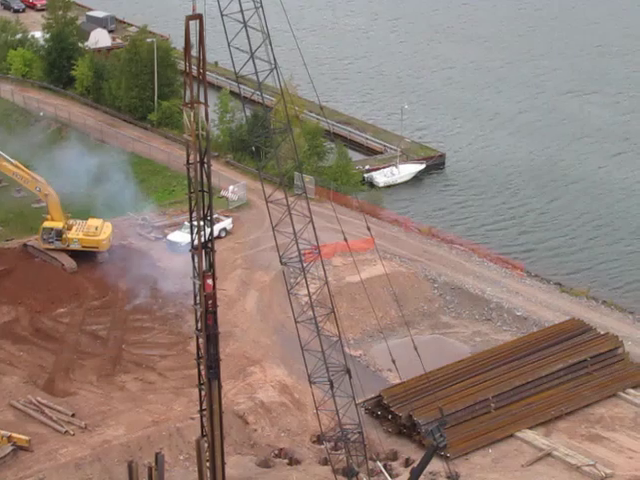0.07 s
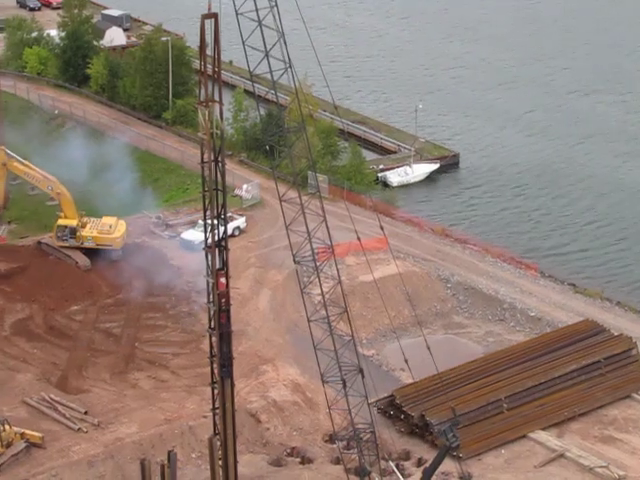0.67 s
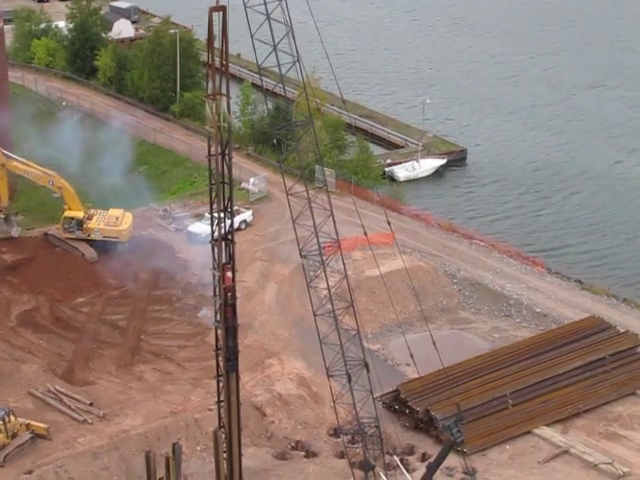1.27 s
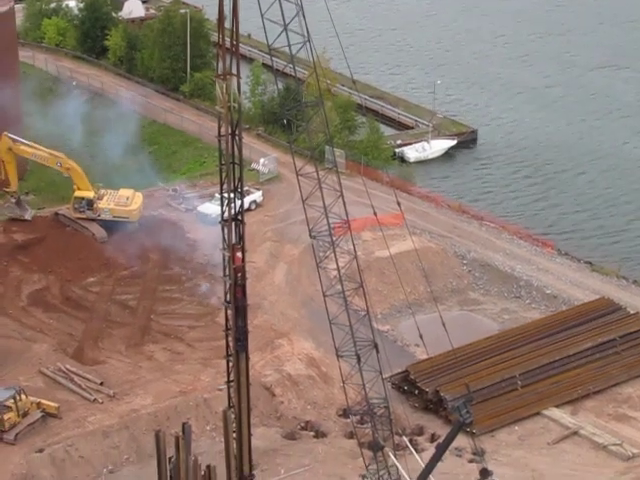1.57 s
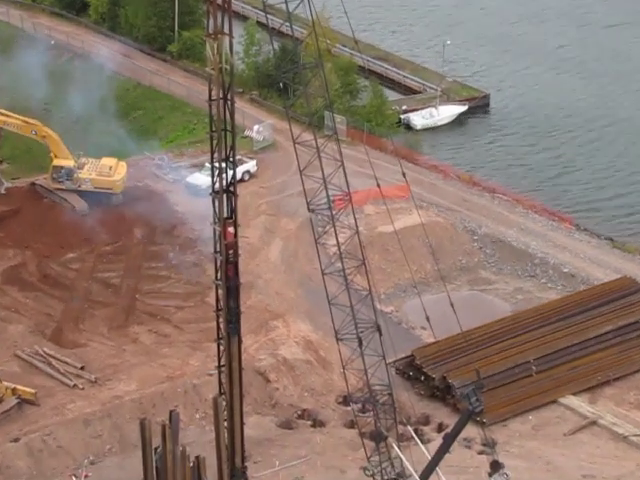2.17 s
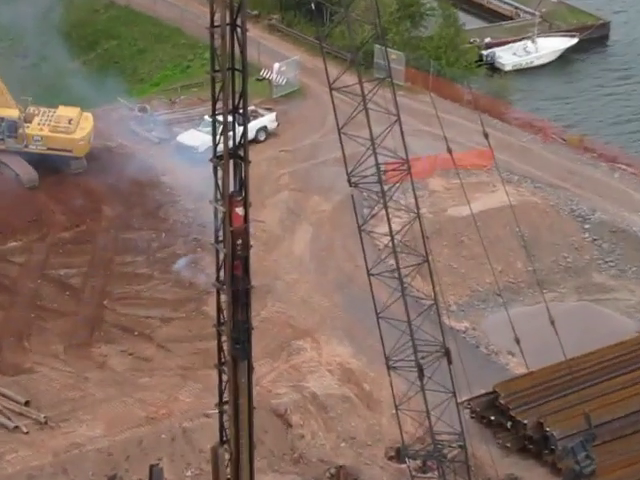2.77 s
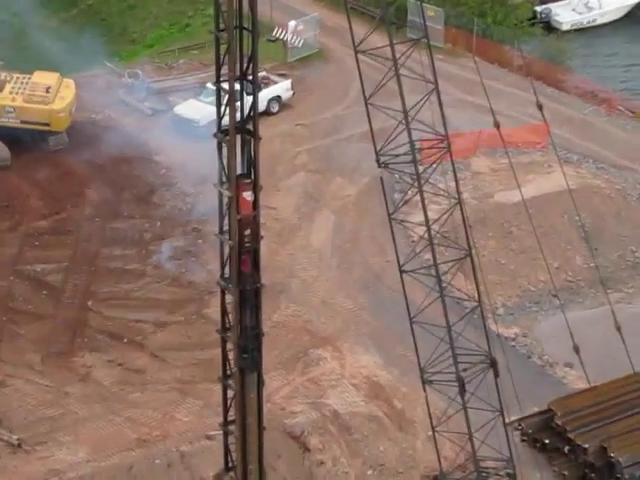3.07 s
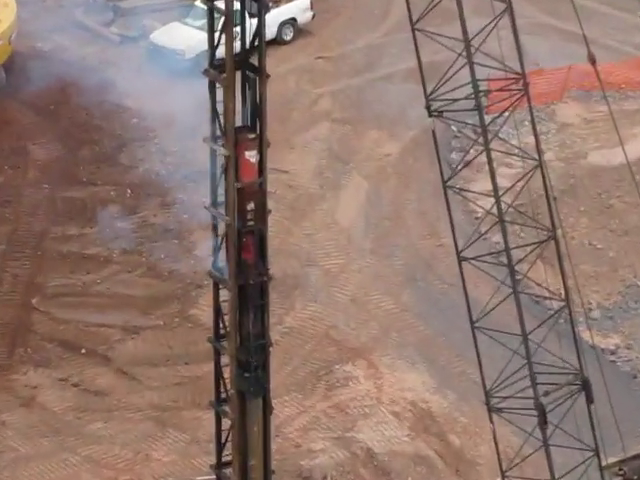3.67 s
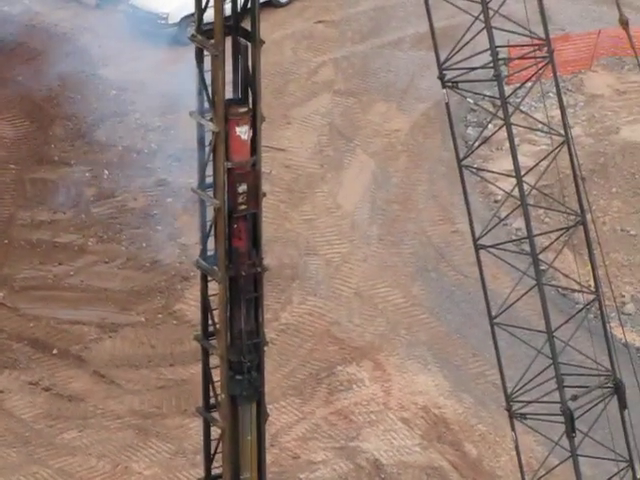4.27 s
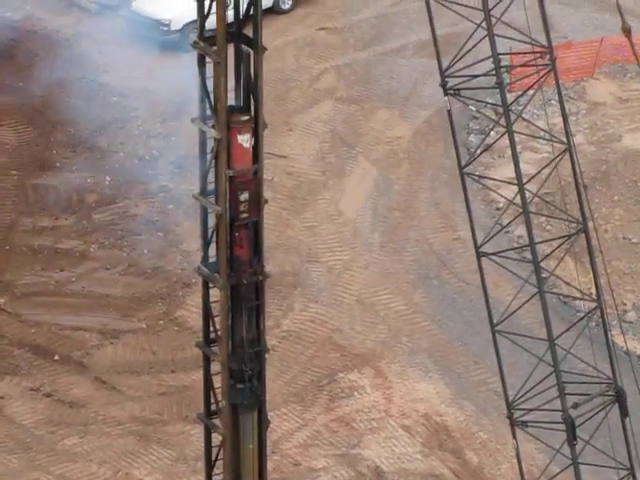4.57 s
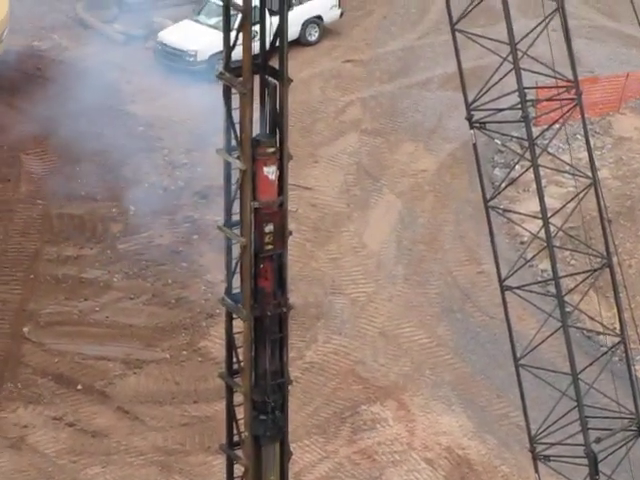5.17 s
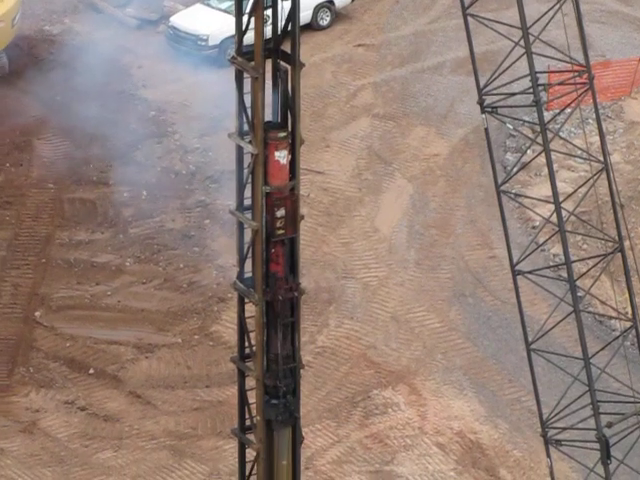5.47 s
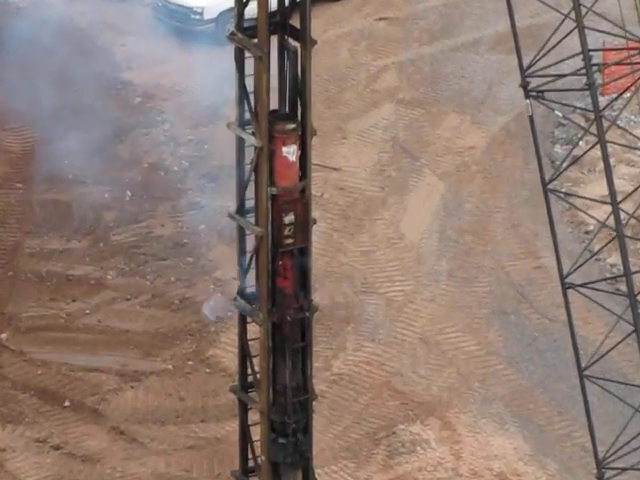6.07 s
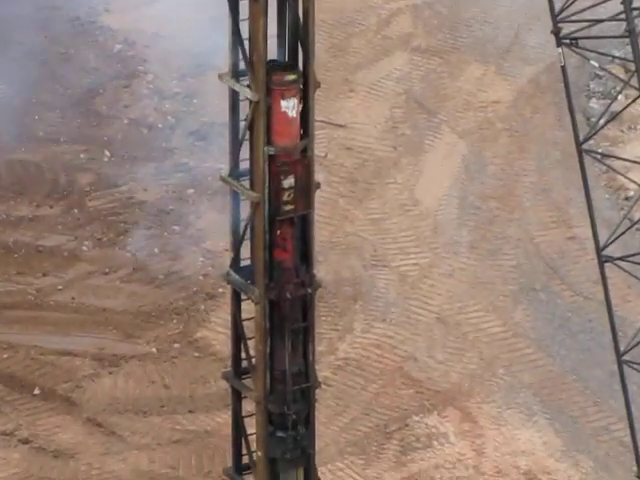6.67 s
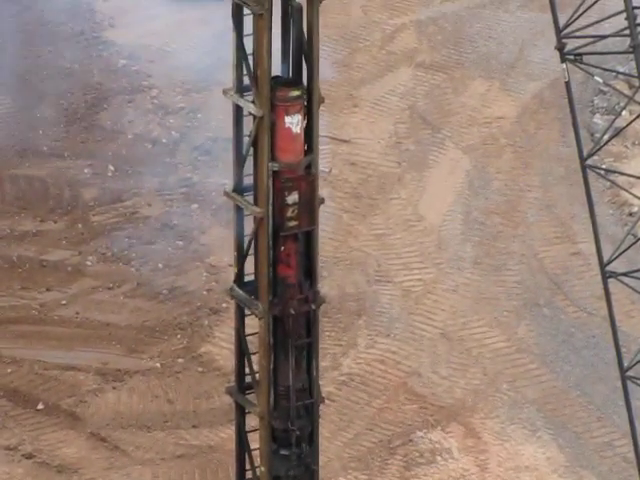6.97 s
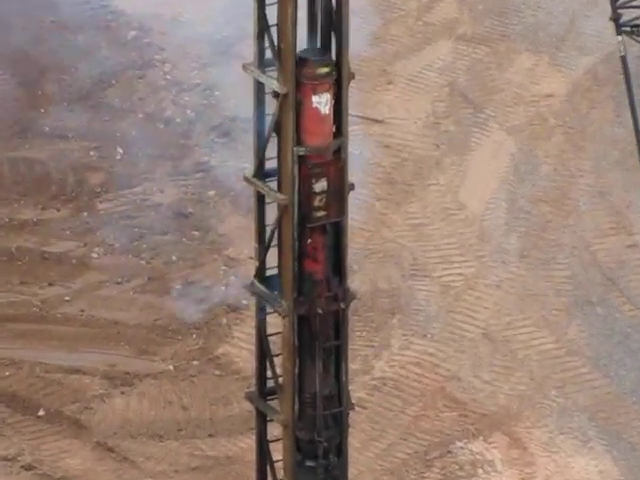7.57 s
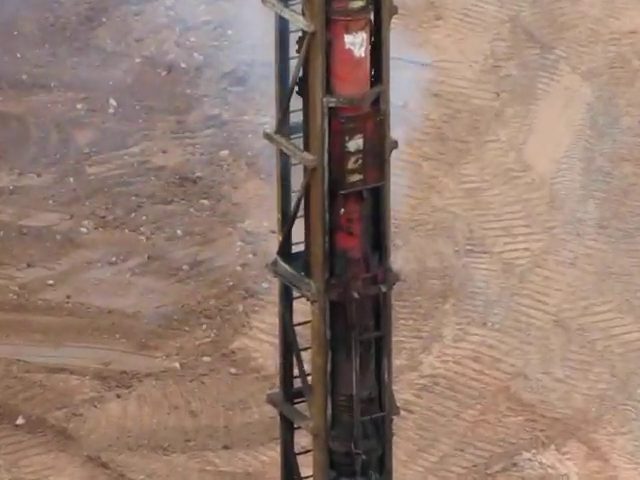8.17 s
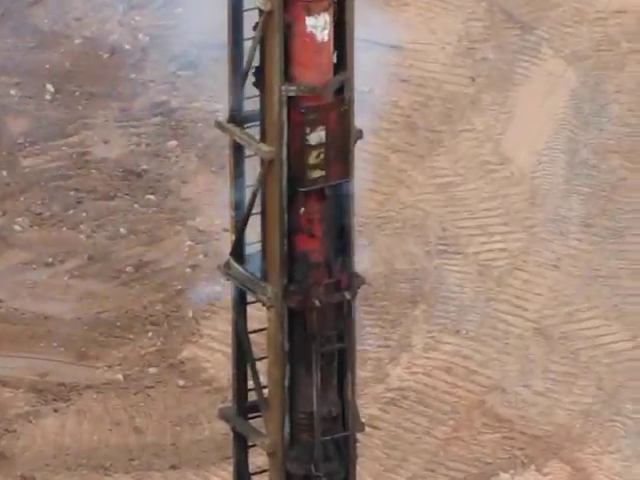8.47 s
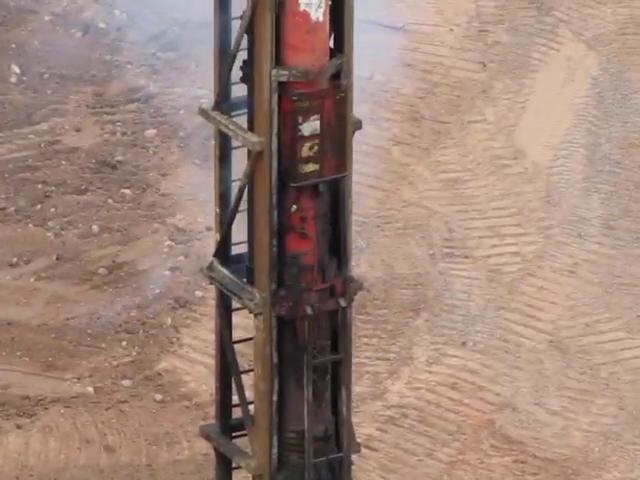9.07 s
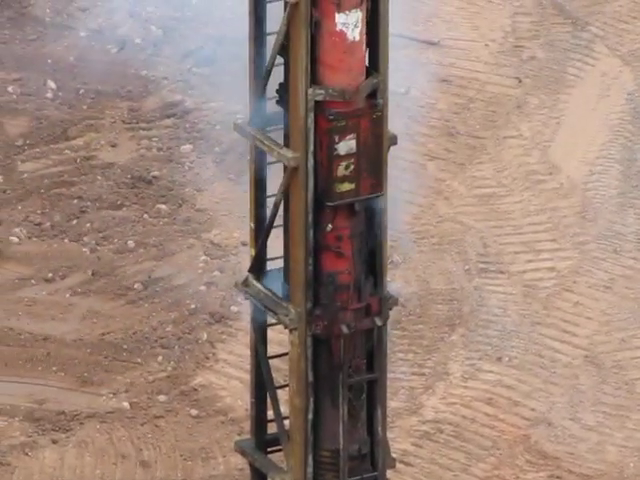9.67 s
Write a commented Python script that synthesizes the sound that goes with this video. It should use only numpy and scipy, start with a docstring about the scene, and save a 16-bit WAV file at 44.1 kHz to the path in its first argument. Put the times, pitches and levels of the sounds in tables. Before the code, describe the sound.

A diesel pile hammer drives a steel pile on a waterfront building site, heard from high above. The sound opens on the ringing tail of a blow. Further heavy blows land at about 1.1, 2.3, 3.5, 4.8, 6.0, 7.2, 8.4 and 9.6 seconds. Each is led by a faint click and the hiss of the falling ram, then hits with a hard crack and ringing steel. A sharp, hissing exhaust burst follows immediately, and an echo rolls back from the surroundings. The background dips slightly at each blow. Crane and excavator engines drone underneath, growing louder around 2 seconds, with a thin hydraulic whine and a faint fan hum. Loose steel clinks lightly near 2.6 seconds and rattles near 7 seconds. Low wind rumbles softly on the microphone, with one brief gust at about 8 seconds.

```python
"""A waterfront building site, the microphone high above a diesel pile hammer driving a steel pile.
Every 1.2 s the falling ram hisses, strikes and fires: the pile rings, exhaust bursts from the ports,
and far banks and buildings answer. Crane and excavator engines, hydraulics and a fan run underneath.
Wind rumbles on the microphone, and its gain control ducks at the blows."""
import sys
import numpy as np
from scipy import signal
from scipy.fft import rfft, irfft, next_fast_len
from scipy.io import wavfile
from scipy.ndimage import map_coordinates

SR = 44100
rng = np.random.default_rng(int(sys.argv[2]) if len(sys.argv) > 2 else 0)


def put_to_file(sound):
    """Save the sound as 16-bit audio at rate SR, in the file named by the first command-line argument."""
    columns = np.atleast_2d(sound).T  # one column per channel
    safe = np.clip(columns, -1, 1)
    whole_steps = np.round(safe * 32767)
    wavfile.write(sys.argv[1], SR, whole_steps.astype(np.int16))


N = 437472

# Levels in spectra, resonances and modes are relative; a noise spectrum gives the level per hertz.
# sound straight from the hammer to the microphone: f/Hz, left-right correlation
DIRECT = [(60, 0.97), (150, 0.94), (380, 1.0), (950, 0.98), (2380, 0.98), (5980, 0.81), (15000, 0.92)]
# sound reaching the microphone from all around: f/Hz, left-right correlation
DIFFUSE = [(60, 0.98), (130, 1), (290, 0.99), (640, 0.98), (1410, 0.89), (3100, 0.72), (6820, 0.68),
           (15000, 0.26)]
# wind rumble: f/Hz, level/dB
WIND_SPECTRUM = [(15, -7), (50, -5.5), (110, -7), (250, -17), (1000, -71), (5000, -120)]
# roar of the diesel engines: f/Hz, level/dB
ENGINE_SPECTRUM = [(13, -47), (22, -20.5), (99, -3.5), (130, -10), (237, -6.5), (271, -7.5), (347, -4.5),
                   (387, -14), (455, -11), (494, -11.5), (1090, -15), (2610, -18.5), (3250, -24),
                   (5320, -28), (15000, -80)]
# level of the engine roar over time: t/s, level/dB
ENGINE_LEVEL = [(0, -30), (1, -32), (2, -25.5), (7.8, -24.5), (9.9, -25.5)]
# engine tones, the firing rate first: f/Hz, level/dB, width/Hz
ENGINE_TONES = [(101.5, -35, 2.2), (236.5, -40.5, 5), (316, -47, 5.9), (455, -40, 5.4), (800, -46.5, 22),
                (1250, -47, 14)]
# whine of the hydraulics: f/Hz, width/Hz, level/dB
WHINE_PEAKS = [(2117, 95, -2.5), (2244, 60, 0), (2390, 85, -1.5), (2603, 70, 3), (2580, 1100, -9),
               (5400, 1300, -21.5), (9410, 60, -39)]
# the whine as the hydraulics work: t/s, level/dB
HYDRAULIC_EFFORT = [(0, -32.5), (1.4, -41), (2.2, -31.5), (4.4, -30.5), (6.6, -36), (9.9, -38.5)]
# the pump works: start/s, end/s, level added to idle/dB
PUMP_RUNS = [(0.1, 0.8, -44.5), (9.08, 9.55, -39.5)]
# the fan works harder: start/s, end/s, level added to idle/dB
FAN_RUNS = [(4.25, 4.45, -39), (6.7, 7.85, -32)]
# echo of the site: f/Hz, level/dB
ECHO_SPECTRUM = [(60, -24), (170, 4.5), (370, -1.5), (520, 0.5), (800, 5), (1400, -4.5), (2150, 4),
                 (3200, -2), (5000, -16.5), (8000, -24), (11000, -46.5), (15000, -71)]
# decay of that echo: f/Hz, t60/s
ECHO_DECAY = [(100, 1.94), (800, 1.79), (2500, 1.013), (8000, 1.08)]
# loose steel on the leader, the hammer's guide mast: t/s, level/dB, f/Hz, t60/s
CLINKS = [(2.59, -23, 2130, 0.35), (3.82, -30, 2100, .3), (7.01, -26, 745, 0.56)]
# the hammer rattles on its leader: t/s, level/dB, t60/s
RATTLES = [(3.12, -34, .2), (7.01, -29, .22), (7.056, -33, .25)]
# hiss and scrape of the sliding ram: f/Hz, level/dB
SLIDE_SPECTRUM = [(300, -31), (900, -24.5), (2400, 5.5), (4200, -6.5), (6000, -13), (8000, -19),
                  (10000, -35), (15000, -47)]
# gas through barely open ports: f/Hz, level/dB
HISS_SPECTRUM = [(1000, -26), (3000, -15), (3700, 7.5), (4350, -6), (4850, -0.5), (6200, -8), (7700, -6),
                 (8700, -14), (11000, -22), (15500, -41)]
# the full exhaust burst: f/Hz, level/dB
EXHAUST_SPECTRUM = [(100, -10.5), (600, -18), (1300, -4), (2000, 0), (3100, -1), (3650, -5), (4300, -11),
                    (4800, -7.5), (6200, -17), (7800, -26), (15500, -61)]
# resonances at which the ports bark: f/Hz, width/Hz, level/dB
PORT_PEAKS = [(2040, 330, 0), (2380, 500, -4), (3780, 400, -4), (4740, 260, -5.5)]
# the pile's longest notes: f/Hz, width/Hz, level/dB
HUM_PEAKS = [(371.8, 27, -1), (824, 50, -11), (1046, 24, -9)]
# bending wave along the pile: f/Hz, level/dB
BEND_SPECTRUM = [(110, -42), (170, -11), (240, 0), (330, -19.5), (600, -10.5), (900, -21), (1150, -18),
                 (1500, -23), (3000, -46)]
# modes of the pile: f/Hz, level/dB, delay/s, swell/s, t60/s
PILE_MODES = [(79, -19.5, 0.0065, 0.011, 0.31), (139.3, -13.5, 0.0036, 0.013, 0.22),
              (189, -9, 0.0011, 0.042, 0.19), (244.4, -1.5, 0.019, 0.019, 0.15),
              (352.7, -1.5, 0.0394, 0.015, 0.21), (383.7, -9.5, 0.055, 0.021, 0.4),
              (455.4, -9, .015, 0.015, 0.32), (515, -15.5, 0.0053, 0.032, 0.3),
              (648, -15, 0.011, 0.033, 0.16), (822, -13, 0.021, 0.054, 0.23), (936, -21, 0, 0.017, 0.5),
              (1046, -16.5, 0.0094, .02, 0.32), (1091, -13, .005, 0.013, 0.21),
              (1244, -14, 0.013, 0.01, 0.65), (1414, -26, .005, .015, .25), (1915, -14, 0.013, .015, 0.33),
              (2110, -20, 0.0058, 0.022, 0.33), (2422, -17, 0, 0.012, 0.34),
              (2627, -13.5, 0.002, 0.0084, 0.18), (3570, -24, 0, .015, .3)]
# dense ringing of the steel: f/Hz, level/dB
STEEL_SPECTRUM = [(60, -23), (300, 9.5), (550, -0.5), (750, -0.5), (1150, -2), (1450, -9.5), (1900, -2),
                  (2600, -5), (3500, -9.5), (5000, -19), (7500, -28), (9500, -50), (15000, -62)]
# decay of that ringing: f/Hz, t60/s
STEEL_DECAY = [(300, 0.29), (1200, 0.61), (2500, 0.56), (8000, 0.29)]
# modes of the anvil and drive cap: f/Hz, level/dB, t60/s
ANVIL_MODES = [(194, -1, 0.044), (373.4, 2.5, 0.05), (850, 2, 0.034), (999, 0.5, 0.049),
               (1246, -10.5, 0.082), (1906, 1.5, 0.028), (2160, -6.5, 0.11), (2340, -13, .05),
               (2616, -2, 0.053)]
# crack of the impact: f/Hz, level/dB
CRACK_SPECTRUM = [(100, -20), (400, -6), (1000, -3), (2600, -3.5), (4000, -14.5), (7000, -30.5),
                  (10000, -49), (15000, -60)]
# the blows: t/s, blow gain/dB, exhaust gain/dB, port hiss gain/dB, strike gain/dB, fuel lever level/dB
BLOWS = [(-0.078, -2.5, -5, -5.5, 0, -40), (1.0921, -2, 0, 1.5, -1.5, -32), (2.2997, 0, 0.5, 3, -0.5, -31),
         (3.529, -1, 2.5, -2, 1, -34), (4.7726, 0, 2.5, -2, 0.5, -37), (5.998, 0, 2.5, 3.5, 1, -35),
         (7.2084, 1, 2.5, 3.5, -0.5, -36), (8.4207, 0.5, 4.5, -0.5, -1.5, -38),
         (9.6177, -0.5, 4, -2.5, -0.5, -34)]

LEVER_LEAD_S, SCRAPE_LEAD_S = .243, 0.093  # ahead of each blow
EXHAUST_LAG_S = 0.1305  # the rebounding ram opens the ports this long after the blow


def amp(db):
    """Decibels to gain."""
    return 10 ** (np.asarray(db) / 20)


def unit(x):
    """Scaled to rms 1."""
    return x / np.sqrt(np.mean(x ** 2) + 1e-20)


def along(points, hz):
    """(f/Hz, value) points read on a log frequency axis."""
    f, v = np.transpose(points)
    return np.interp(np.log(hz + 1), np.log(f + 1), v)


def wobble(rate):
    """A smooth random curve, rate knots a second."""
    steps = np.arange(0, N + 64, 64)
    knots = rng.standard_normal(int(N * rate / SR) + 4)
    return np.interp(np.arange(N), steps, map_coordinates(knots, [steps * rate / SR]))


def tone(hz):
    """A sine that follows a pitch curve."""
    return np.sin(2 * np.pi * np.cumsum(hz) / SR)


def rise(t, length):
    """A smooth step from 0 at t = 0 to 1 at t = length."""
    return np.sin(np.pi / 2 * np.clip(t / length, 0, 1)) ** 2


def decay(t, t60):
    """1 until t = 0, then 60 dB down in t60."""
    return np.exp(-np.log(1000) * np.maximum(t, 0) / t60)


def bump(t, length):
    """A bell-shaped swell around t = 0."""
    return np.exp(-(t / length) ** 2)


def add(track, s, sound):
    """Mixes a sound into the track at time s."""
    i = round(s * SR)
    part = sound[:, max(-i, 0):N - i]
    track[:, max(i, 0):][:, :part.shape[1]] += part


def filtered(x, response):
    """x times a response of frequency."""
    n = x.shape[-1]
    m = next_fast_len(n + 8192)
    return irfft(rfft(x, m) * response(np.fft.rfftfreq(m, 1 / SR)), m)[..., :n]


def bins(z):
    """The frequencies of a spectrum's bins."""
    return np.linspace(0, SR / 2, z.shape[1])


def white(size, alike=DIFFUSE):
    """The spectrum of stereo white noise with a given left-right correlation."""
    z = rng.standard_normal((2, size + 2)).view(complex)
    turn = np.arccos(np.clip(along(alike, bins(z)), -1, 1)) / 2
    mid, side = z[0] * np.cos(turn), z[1] * np.sin(turn)
    return np.array([mid + side, mid - side])


def coloured(z, spectrum):
    """Noise of rms 1 with a (f/Hz, level/dB) colour."""
    return unit(irfft(z * amp(along(spectrum, bins(z)))))


def resonant(z, peaks):
    """Noise of rms 1 held in (f/Hz, width/Hz, level/dB) resonances."""
    f = bins(z)
    response = sum(amp(db) / (1 + (2 * (f - hz) / width) ** 2) for hz, width, db in peaks)
    return unit(irfft(z * response))


def narrow(size, hz, width_hz):
    """Noise held in one resonance."""
    return resonant(white(size), [(hz, width_hz, 0)])


def fading(x, t60s):
    """Each frequency dies at its own speed."""
    hz, t, z = signal.stft(x, SR, nperseg=256)
    damped = z * decay(t, along(t60s, hz)[:, None])
    return signal.istft(damped, SR, nperseg=256)[1][:, :x.shape[-1]]


def repeated(pattern, fresh, steady_hz):
    """The same steel and paths answer every blow alike in the bass; moving air scrambles the treble."""
    change = bins(pattern) / steady_hz
    return (pattern + change * fresh) / np.hypot(1, change)


def duty(runs, idle_db, spool_s=0.13):
    """Gain of a machine that idles, comes up for each run and winds down again."""
    t = np.arange(N) / SR
    working = sum(amp(db) * (rise(t - start, spool_s) - rise(t - end, spool_s))
                  for start, end, db in runs)
    return amp(idle_db) + working


def breeze():
    """Air eddies right at the microphone, at each port on its own."""
    return amp(-42 + 2.5 * wobble(3)) * coloured(white(N, alike=[(50, 0)]), WIND_SPECTRUM)


def wind(t, gust_at_s=8.11):
    """Wind over the site: a low rumble with slow swings, quick flutter and one gust."""
    flow = amp(-47 + 3.5 * wobble(1.5)) + amp(-23) * bump(t - gust_at_s, .09)
    return flow * amp(2.3 * wobble(13)) * coloured(white(N), WIND_SPECTRUM)


def engines(t):
    """Crane and excavator diesels down on the site: wavering tones over a roar that pulses as they fire."""
    level_db = np.interp(t, *np.transpose(ENGINE_LEVEL))
    firing = 1 + 0.092 * tone(ENGINE_TONES[0][0] + .6 * wobble(2.8))
    roar = amp(level_db + 0.93 * wobble(9.1)) * firing * coloured(white(N), ENGINE_SPECTRUM)
    tones = sum(amp(db + 3.4 * wobble(4.8)) * tone(hz + width * wobble(3 * width) / 2)
                for hz, db, width in ENGINE_TONES)
    return roar + tones


def hydraulics(t):
    """The hydraulics whine louder the harder they work."""
    effort_db = np.interp(t, *np.transpose(HYDRAULIC_EFFORT))
    return amp(effort_db + wobble(9.9)) * resonant(white(N), WHINE_PEAKS)


def fan():
    """A cooling fan: a low, wavering tone that swells for each run."""
    return duty(FAN_RUNS, idle_db=-43.5) * amp(1.5 * wobble(12)) * tone(346 + 5 * wobble(8))


def pump():
    """A hydraulic pump: a high, narrow whine that swells for each run."""
    return duty(PUMP_RUNS, idle_db=-46) * narrow(N, hz=2160, width_hz=58)


def site_echo(t, pattern):
    """The site answers a blow; far banks and buildings send back a second swell."""
    swells = rise(t - .04, 0.066) * (1 + 0.5 * bump(t - .315, 0.022))
    reflections = coloured(repeated(pattern, white(len(t)), steady_hz=694), ECHO_SPECTRUM)
    return amp(-7.5) * fading(reflections, ECHO_DECAY) * swells


def clinks(lever_hz=3980, lever_t60_s=.15):
    """The falling ram trips the fuel lever with a click, and loose steel on the leader rings briefly."""
    out, t = np.zeros((2, N)), np.arange(SR // 2) / SR
    lever = [(s - LEVER_LEAD_S, lever_db, lever_hz, lever_t60_s) for s, *_, lever_db in BLOWS]
    for s, db, hz, t60 in lever + CLINKS:
        add(out, s, amp(db) * narrow(len(t), hz, width_hz=.18 * hz) * rise(t, 0.0055) * decay(t, t60))
    return out


def ram(t):
    """The falling ram pushes air from the ports and scrapes past them; now and then the hammer rattles."""
    fall = sum(rise(t - s + 0.35, 0.093) * (1 - rise(t - s, .02)) for s, *_ in BLOWS)
    scrapes = amp(-36) * sum(bump(t - s + SCRAPE_LEAD_S, .024) for s, *_ in BLOWS)
    rattles = sum(amp(db) * rise(t - s, .006) * decay(t - s, t60) for s, db, t60 in RATTLES)
    contact = scrapes + rattles
    ticks = amp(-17) * contact * coloured(white(N), HISS_SPECTRUM)
    air = amp(-37.5 + 2.8 * wobble(25)) * fall
    return (air + contact) * coloured(white(N), SLIDE_SPECTRUM) + ticks


def exhaust(t, hiss_db):
    """The rising ram uncovers the ports: a thin hiss through the slit, a burst and a bark as they gape."""
    trail = amp(-6.0) * rise(t, 0.016) * decay(t, 0.26)
    burst = np.hypot(rise(t + .03, 0.047) * decay(t - .01, 0.032), trail)
    slit = np.hypot(rise(t + 0.023, 0.016) * decay(t - .006, 0.056), trail)
    gas = amp(-6.5) * coloured(white(len(t), DIRECT), EXHAUST_SPECTRUM)
    hiss = amp(hiss_db - 14.0) * coloured(white(len(t), DIRECT), HISS_SPECTRUM)
    bark = amp(-9.5) * resonant(white(len(t)), PORT_PEAKS) * bump(t - .008, 0.011)
    return gas * burst + hiss * slit + bark


def pile_hum(t):
    """A few of the pile's notes linger after the blow."""
    return amp(-20.0) * rise(t - .05, 0.042) * decay(t - .18, 1.48) * resonant(white(len(t)), HUM_PEAKS)


def bending_wave(t, arrival_s=.0192, arrival_hz=1201):
    """Short bending waves outrun long ones, so the blow arrives as a falling sweep, pitch ~ 1 / t^2."""
    hz = arrival_hz * (arrival_s / np.maximum(t, arrival_s / 2)) ** 2
    return amp(along(BEND_SPECTRUM, hz)) * decay(t - .07, .1) * tone(hz)


def pile(t, phases):
    """Bending waves run down the pile and back, so its modes swell after the blow."""
    ring = 0
    for (hz, db, delay, swell, t60), phase in zip(PILE_MODES, phases):
        envelope = rise(t - delay, swell) * decay(t - delay - swell, t60)
        ring += amp(db + rng.normal(0, 0.84)) * envelope * np.sin(2 * np.pi * hz * t + phase)
    return ring


def steel(t, pattern):
    """The struck steel rings as a dense wash, longest in the midrange."""
    wash = coloured(repeated(pattern, white(len(t), DIRECT), steady_hz=1700), STEEL_SPECTRUM)
    return amp(0.37) * fading(wash, STEEL_DECAY) * rise(t, 0.033)


def anvil(t, phases):
    """The ram hits the anvil: short, hard modes."""
    ring = sum(amp(db + rng.normal(0, 1)) * decay(t, t60) * np.sin(2 * np.pi * hz * t + phase)
               for (hz, db, t60), phase in zip(ANVIL_MODES, phases))
    return amp(1.0) * ring * rise(t, 0.0036)


def crack(t):
    """The impact cracks, and just after it the hammer's casing rattles in its guides."""
    impact = rise(t, 0.0047) * decay(t - .007, 0.064)
    casing = amp(-5.5) * bump(t - .038, 0.018)
    return amp(-1.5) * coloured(white(len(t), DIRECT), CRACK_SPECTRUM) * np.hypot(impact, casing)


def hammer():
    """Each cycle: the strike, ringing steel, exhaust, and the answer of the site."""
    out, tail_t = np.zeros((2, N)), np.arange(SR) / SR
    t = tail_t[:SR // 2]
    steel_pattern, site_pattern = white(len(t), DIRECT), white(SR)
    anvil_phases = rng.uniform(0, 2 * np.pi, len(ANVIL_MODES))
    pile_phases = rng.uniform(0, 2 * np.pi, len(PILE_MODES))
    for s, db, exhaust_db, hiss_db, strike_db, _ in BLOWS:
        strike = amp(strike_db) * (crack(t) + anvil(t, anvil_phases))
        ring = steel(t, steel_pattern) + pile(t, pile_phases) + bending_wave(t)
        puff = amp(exhaust_db) * exhaust(t - EXHAUST_LAG_S, hiss_db)
        add(out, s, amp(db) * (strike + ring + puff))
        add(out, s, amp(db) * (site_echo(tail_t, site_pattern) + pile_hum(tail_t)))
    return out


def scene():
    """The whole site as it reaches the microphone high above."""
    t = np.arange(N) / SR
    return hammer() + ram(t) + clinks() + engines(t) + hydraulics(t) + wind(t) + fan() + pump() + breeze()


def gain_control(x, limit_db, release_db_per_s, window_s):
    """Gain drops as soon as the level passes the limit, then creeps back."""
    pole = np.exp(-1 / (window_s * SR))
    power = signal.lfilter([1 - pole], [1, -pole], np.mean(x ** 2, axis=0))
    over_db = np.maximum(10 * np.log10(np.abs(power) + 1e-12) - limit_db, 0)
    creep_db = release_db_per_s * np.arange(N) / SR
    return x * amp(creep_db - np.maximum.accumulate(over_db + creep_db))


def record(dry, start_s=.035, ceiling=1.15, top_hz=15800):
    """The microphone channel opens, rides its gain, rounds off the peaks and cuts the highest treble."""
    opened = dry * (np.arange(N) / SR > start_s)
    levelled = gain_control(opened, limit_db=-13.5, release_db_per_s=3.5, window_s=0.019)
    rounded = levelled / (1 + (levelled / ceiling) ** 4) ** .25
    return filtered(rounded, lambda hz: hz < top_hz)


dry = scene()
out = record(dry)
put_to_file(out)
```